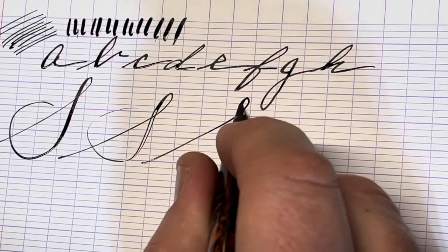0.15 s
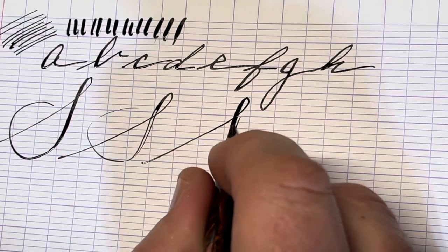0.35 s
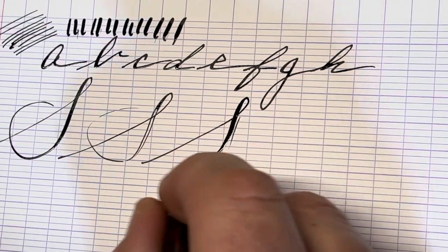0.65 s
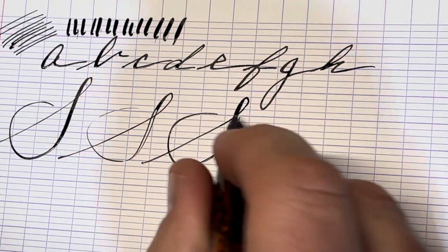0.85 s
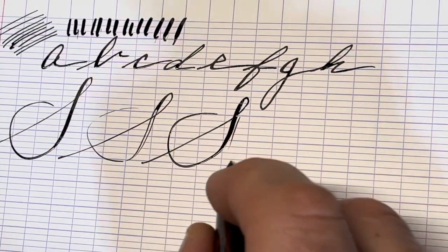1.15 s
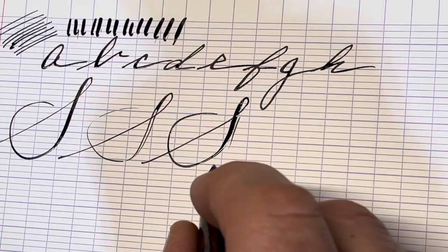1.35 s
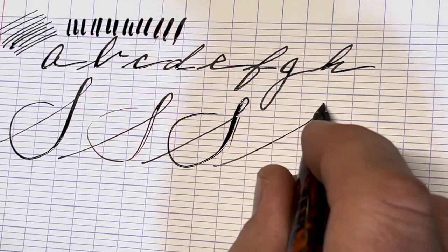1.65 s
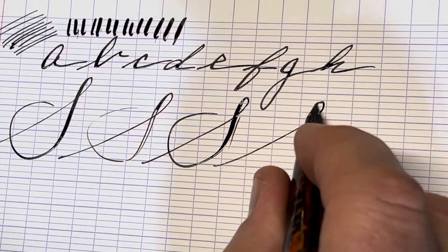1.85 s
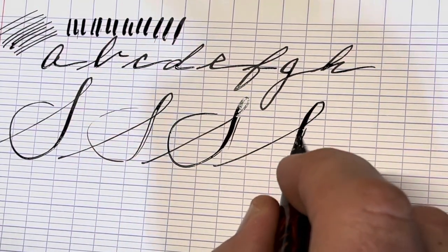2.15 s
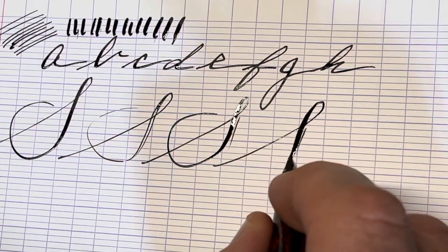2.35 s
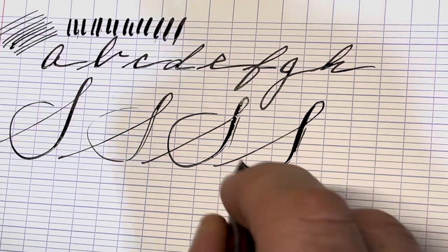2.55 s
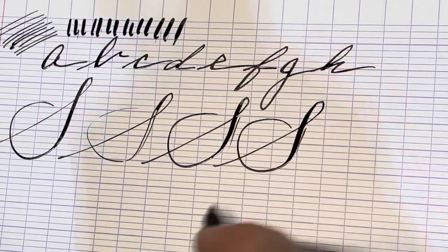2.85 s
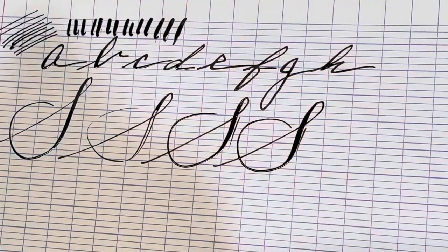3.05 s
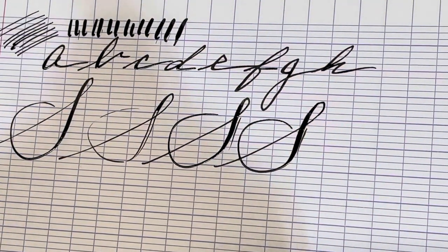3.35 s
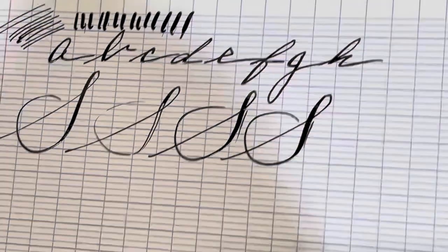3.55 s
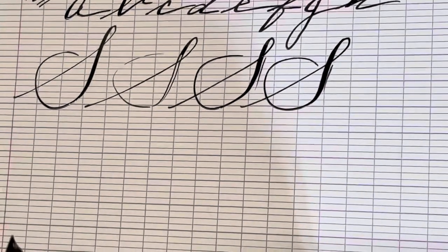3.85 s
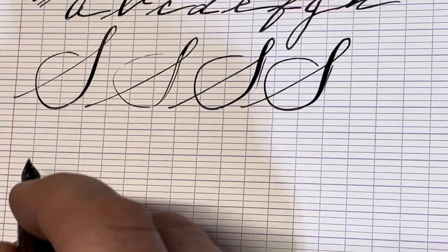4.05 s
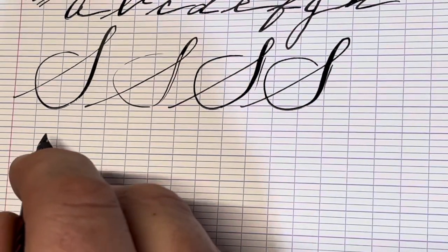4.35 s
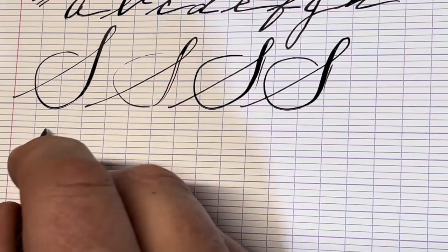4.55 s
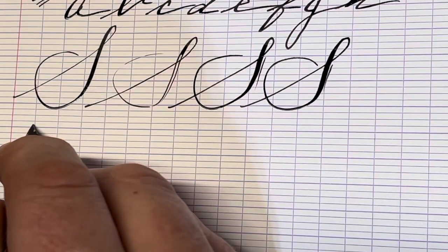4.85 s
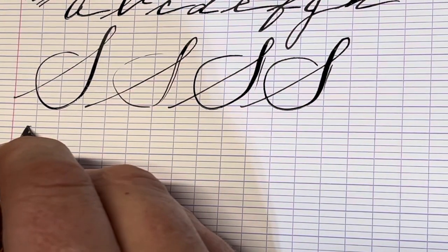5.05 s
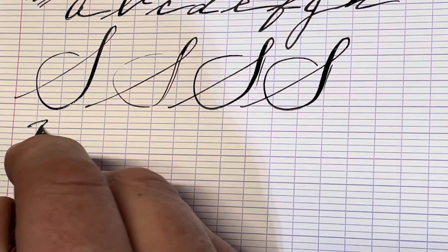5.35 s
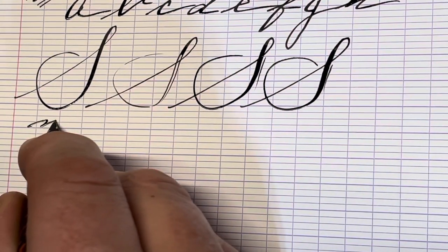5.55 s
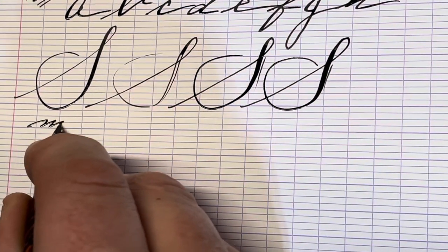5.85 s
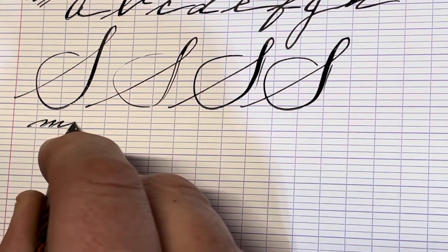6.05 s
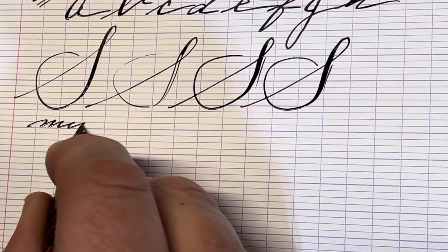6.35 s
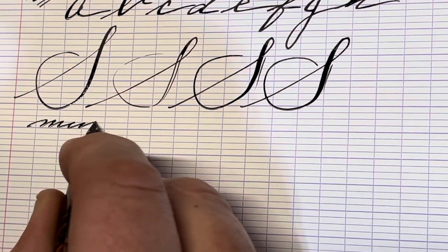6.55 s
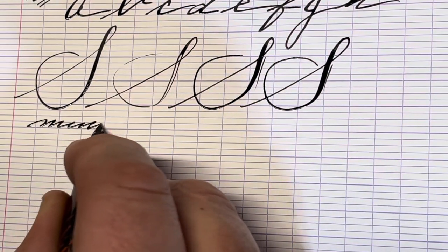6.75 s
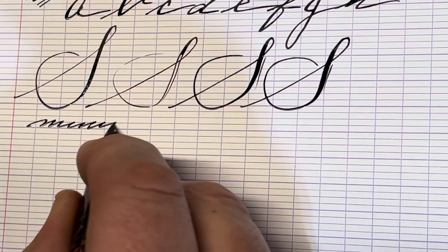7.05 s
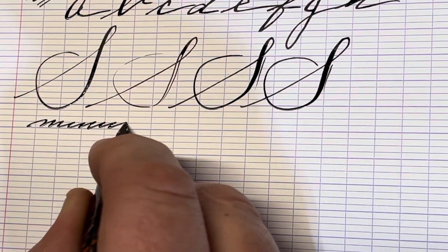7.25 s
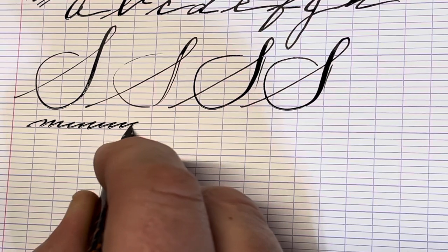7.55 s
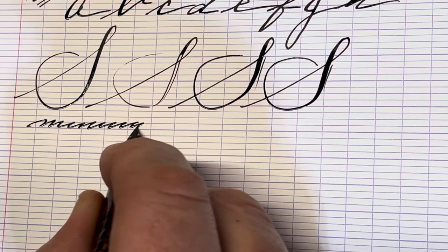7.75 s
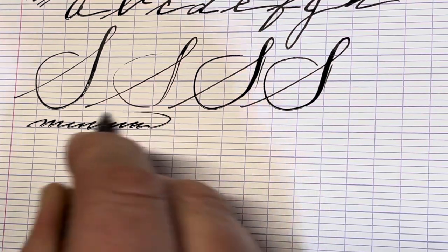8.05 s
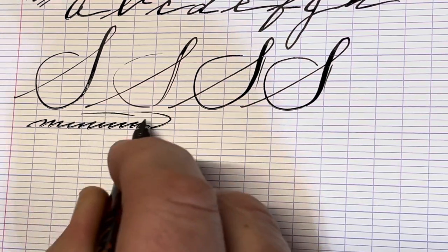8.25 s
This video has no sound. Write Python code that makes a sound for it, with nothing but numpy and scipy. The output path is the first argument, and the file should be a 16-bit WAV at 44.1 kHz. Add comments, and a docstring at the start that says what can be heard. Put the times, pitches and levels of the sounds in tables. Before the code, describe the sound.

Close, dry stereo pickup at a desk in a quiet small room with faint low rumble. From 0 to 0.5 seconds a slow nib judders hollowly with small sticky buzzes, then sweeps into a brighter scratch at 0.5-0.8 with a short falling squeak near 0.65. Two small clicks come around 1.0, then a near pause. A quick bright stroke at 1.4-1.6 leads into slow, grainy, hollow dragging until 2.4, then a fast scratch with a tiny steady squeak at 2.5. The hand brushes away in a soft hiss. From 3.1 to 4.3 short paper rubs mix with light knocks, sharpest at 3.5 and 4.1. After a lull and a barely audible fingertip rub, small letters begin at 5.1: faint alternating scratches, several a second, with a dull thump at 6.2. Longer strokes start at 7.85, ending in a crisp flick at 8.15 and a fading skin rub.

```python
"""Flexible fountain pen on ruled paper

A pen writes close to the microphone in a quiet room: it finishes one looped capital and draws another,
the hand slides over the sheet and things are nudged with a few knocks, then come small joined letters
and a closing flick. Clicks and noise of snapping fibres, shaped by spectra and resonances, make the
scratch, the hollow pen body and the slow judder; paired sines with a rasp make the squeaks in fast curves.
Hiss shaped as skin makes the slides, struck modes make the knocks, and shaped noise makes the room.
"""
import sys
import numpy as np
from scipy import signal
from scipy.fft import rfft, irfft
from scipy.io import wavfile
from scipy.ndimage import uniform_filter1d

SR = 44100
rng = np.random.default_rng(int(sys.argv[2]) if len(sys.argv) > 2 else 0)


def put_to_file(sound):
    """Save the sound as 16-bit audio at rate SR, in the file named by the first command-line argument."""
    columns = np.atleast_2d(sound).T  # one column per channel
    safe = np.clip(columns, -1, 1)
    whole_steps = np.round(safe * 32767)
    wavfile.write(sys.argv[1], SR, whole_steps.astype(np.int16))


N = 370440
TIME = np.arange(N) / SR

# Levels and spectra in the tables are relative: a function may trim them as a whole.
# squeaks of the tines in fast curves, one list a squeak: time_s, pitch_hz, level_db
SQUEAKS = [
    [(.59, 4960, -55), (.615, 4600, -50.5), (.648, 3970, -52), (.657, 3390, -39), (.668, 3330, -34.5),
     (.676, 3340, -64)],
    [(2.472, 3350, -47), (2.492, 3210, -34.5), (2.51, 3240, -38), (2.519, 3250, -41), (2.528, 3380, -62)],
]
# spectrum of the slow scratch: frequency_hz, density_db (per Hz)
SLOW_SCRATCH = [(300, -9), (900, 4), (1500, 5), (1850, -6), (2550, -0.5), (3400, -0.5), (4300, 0),
                (5200, 5), (6000, -4), (7000, 0), (8200, 4), (10000, 2.5), (11200, 9), (13000, -30.5),
                (15500, -44)]
# bending resonance of the pen, shifting with grip and direction: time_s, resonance_hz
PEN_BENDING = [(0, 1050), (.66, 1100), (.8, 1030), (1.44, 1500), (1.485, 1400), (1.55, 1055), (1.9, 1030),
               (2.38, 1056), (2.48, 1320), (2.55, 1070), (5.3, 960), (5.88, 960), (6.15, 1180),
               (7.55, 1200), (7.75, 1080), (8.16, 990)]


def amp(db):
    """Level law: decibels to amplitude gain."""
    return 10 ** (np.asarray(db) / 20)


def unit(x):
    """Normalization: scales to rms 1."""
    return x / np.sqrt(np.mean(x ** 2) + 1e-20)


def read(points, hz):
    """Spectral interpolation: reads a table along a log-frequency axis."""
    f, value = np.transpose(points)
    return np.interp(np.log(hz + 1), np.log(f), value)


def follow(rows):
    """Linear interpolation in time: joins the rows of a table, giving one curve a column."""
    s, *columns = np.transpose(rows)
    return [np.interp(TIME, s, c) for c in columns]


def add(mix, s, sound):
    """Superposition: mixes a sound in at time s."""
    part = mix[max(0, round(s * SR)):][:len(sound)]
    part += sound[:len(part)]


def wander(rate_hz):
    """Low-passed chance: a smooth random curve of rms 1, moving up to about the given rate."""
    hz = np.fft.rfftfreq(N, 1 / SR)
    lowpass = 1 / (1 + (hz / rate_hz) ** 4)
    return unit(irfft(rfft(rng.standard_normal(N)) * lowpass, N))


def resonate(x, hz, width_hz):
    """Damped resonance of peak gain 1: shifted to zero frequency, smoothed and shifted back; hz may be a curve."""
    turn = np.exp(2j * np.pi * np.cumsum(hz * np.ones(len(x))) / SR)
    r = np.exp(-np.pi * width_hz / SR)
    smoothed = signal.lfilter([1 - r], [1, -r], x / turn + 1e-18)
    return 2 * (turn * smoothed).real


def resonate_twice(x, hz, width_hz):
    """Cascaded resonance: the second pass steepens the skirts of the peak."""
    return resonate(resonate(x, hz, width_hz), hz, width_hz)


def ring(drive, modes):
    """Modal superposition: plays a drive through a table of modes; rms 1."""
    return unit(sum(amp(db) * unit(resonate(drive, hz, width_hz)) for hz, width_hz, db in modes))


def causal(gain_db):
    """Minimum phase: the impulse response that has this spectrum and starts at once."""
    log_gain = np.log(amp(np.concatenate([gain_db, gain_db[-2:0:-1]])))
    return irfft(np.exp(np.conj(signal.hilbert(log_gain)))[:len(gain_db)])


def swell(rise, hold, fall):
    """Kinematics of one movement: speed, 0-1, gathers, holds and dies away."""
    t = np.arange(0, rise + hold + fall, 1 / SR)
    ramp = np.minimum(t / rise, (rise + hold + fall - t) / fall)
    return np.sin(np.pi / 2 * np.clip(ramp, 0, 1))


def levels(moves, law):
    """Power law of friction: sound of each movement grows as speed ** law, overlaps add in power; in dB."""
    power = np.zeros(N)
    for start, rise, hold, fall, db in moves:
        add(power, start, (amp(db) * swell(rise, hold, fall) ** law) ** 2)
    return 10 * np.log10(power + 1e-12)


def fibres(rate, spread_db, smooth):
    """Impulsive friction: fibres snap past the tip as uneven clicks, rate a second, over a smooth rub."""
    sizes = amp(spread_db * np.minimum(rng.exponential(1, N), 4))
    snaps = (rng.random(N) < rate / SR) * rng.choice([-1, 1], N) * sizes
    return unit(unit(snaps) + smooth * rng.standard_normal(N))


def colour(x, spectrum, patchy_db, bright_db=0):
    """Time-varying filtering: peaks drift as the contact moves; rms 1 in the hiss band, 4-9.5 kHz."""
    hz, t, z = signal.stft(x, SR, nperseg=512, noverlap=384)
    patches = uniform_filter1d(rng.standard_normal(z.shape), size=6, axis=0)
    patches = unit(uniform_filter1d(patches, size=14, axis=1))
    bright = np.interp(t, TIME, bright_db * np.ones(N))
    # brightness tilts in dB per octave about 7 kHz, up to 0.7 octave either way
    slope = np.clip(np.log2((hz + 1) / 7000), -.7, .7)
    gain_db = read(spectrum, hz)[:, None] + patchy_db * patches + slope[:, None] * bright
    y = signal.istft(z * amp(gain_db), SR, nperseg=512, noverlap=384)[1][:N]
    hiss_band = signal.butter(4, [4000, 9500], "band", fs=SR, output="sos")
    return y / np.std(signal.sosfilt(hiss_band, y))


def room_tone():
    """Partial coherence: a low steady rumble with very little hiss, less alike in the two ports in the low
    mids, most apart near 600 Hz and fully alike again from 4 kHz."""
    # spectrum: frequency_hz, density_db (per Hz)
    spectrum = [(15, -43), (30, -12.5), (48, 1), (68, -2.5), (95, -4), (145, -8.5), (185, -16.5),
                (290, -18.5), (420, -32.5), (750, -34.5), (1300, -47), (4000, -56.5), (11000, -52.5),
                (15000, -83)]
    # left-right likeness: frequency_hz, coherence (0-1)
    likeness = [(30, 1), (130, 0.98), (260, 0.75), (600, 0.49), (4000, 1)]
    level_db = -51
    hz = np.fft.rfftfreq(N, 1 / SR)
    a, b = rfft(rng.standard_normal((2, N)))
    same = np.clip(read(likeness, hz), -1, 1)
    pair = np.array([a, same * a + np.sqrt(1 - same ** 2) * b])
    return amp(level_db) * unit(irfft(pair * amp(read(spectrum, hz)), N))


def reflections(x, t60, wet_db, dull_hz):
    """Early reflection and decay: near surfaces and a small dead room answer dully, differently in each port."""
    # first reflections from things near the desk, before dulling: delay_s, left_db, right_db
    echoes = [(.0023, -59, -34.5), (.0041, -16.5, -27), (.0068, -16.5, -18.5)]
    t = np.arange(SR // 2) / SR
    sparse = rng.standard_normal((2, len(t))) * (rng.random((2, len(t))) < 2000 / SR)
    tail = sparse * amp(-60 * t / t60) * (t > .003)
    tail *= amp(wet_db) / np.linalg.norm(tail[0])
    for delay, left_db, right_db in echoes:
        tail[:, round(delay * SR)] += amp([left_db, right_db])
    tail = signal.sosfilt(signal.butter(1, dull_hz, fs=SR, output="sos"), tail)
    return signal.fftconvolve(x[None], tail, axes=1)[:, :N]


def knocks():
    """Impact excitation: a blow and brief rattle pass the pad, ring one mode of the thing struck, thud in the desk."""
    # pen, pad and desk knocks: start_s, level_db, low_edge_hz, hardness_hz, ring_hz, ring_db,
    # blow_decay_s, desk_thud_db
    blows = [(.98, -43.5, 700, 9200, 3620, 4, 0.0025, -22), (1.024, -48, 2100, 12000, 3460, 1, 0.0014, -23),
             (3.092, -55.5, 400, 3000, 720, -4, 0.0011, -17),
             (3.148, -54, 500, 2000, 1010, -11, 0.0027, -14),
             (3.208, -58, 900, 7000, 2600, -8, 0.0028, -24),
             (3.288, -57, 2000, 12000, 9000, -10, .003, -31),
             (3.534, -27, 990, 7700, 4500, -10, 0.0019, -29),
             (3.579, -46.5, 700, 1500, 1060, 2.5, 0.003, -33),
             (3.655, -55, 500, 9000, 5240, -23, 0.0023, -14), (3.751, -39, 494, 3600, 2520, 4, 0.0013, -9),
             (3.872, -44, 399, 2540, 824, -8.5, 0.0027, -7.5),
             (3.972, -48, 500, 1420, 890, 0.5, 0.0066, -28),
             (4.095, -26, 431, 2660, 2460, -0.5, 0.0022, -30),
             (4.105, -34, 398, 2000, 834, -12, 0.0056, -10.5),
             (4.229, -48, 400, 2000, 760, -7, 0.0061, -11),
             (5.054, -65, 616, 6020, 2530, -18, 0.00083, -27),
             (6.212, -34, 150, 780, 635, -31, 0.025, -2.5),
             (6.574, -71.5, 3000, 12000, 11370, 17.5, 0.0014, -25),
             (7.284, -63.5, 3000, 12000, 11200, 7, 0.0035, -25)]
    # desk modes: frequency_hz, width_hz, level_db
    desk_modes = [(86.6, 14, -19.5), (120.2, 13, 8), (193, 27, 14), (261, 6.8, 0.5), (310, 40, -16.5),
                  (466, 15.4, 3.5)]
    # spectrum of the pad: frequency_hz, density_db (per Hz)
    pad_spectrum = [(100, -3.5), (400, -3), (600, 2.5), (1000, -0.5), (1450, -2), (1800, -2.5), (2700, 1),
                    (3500, -7.5), (4400, -2), (7000, -4.5), (9000, -1.5), (11500, -5), (13300, -23.5),
                    (15500, -27.5)]
    out, t, hz = np.zeros(N), np.arange(8192) / SR, np.fft.rfftfreq(2048, 1 / SR)
    for s, db, low_hz, hard_hz, ring_hz, ring_db, decay, thud_db in blows:
        fading = np.exp(-t / decay) + amp(-16.5) * np.exp(-t / .016)
        rattle = unit(rng.standard_normal(len(t)) * fading)
        tap = unit(signal.unit_impulse(len(t)))
        # soft blows lose the treble, light things radiate no bass
        treble_loss = 1 + (hz / hard_hz) ** 3
        bass_loss = 1 + (low_hz / (hz + 20)) ** 4
        pad = causal(read(pad_spectrum, hz) - 10 * np.log10(treble_loss * bass_loss))
        blow = unit(signal.fftconvolve(0.36 * tap + rattle, pad)[:len(t)])
        note = unit(resonate(tap + .5 * rattle, ring_hz, 150))
        thud = ring(tap, desk_modes)
        add(out, s, amp(db - 19.5) * (blow + amp(ring_db) * note + amp(thud_db) * thud))
    return out


def finger():
    """Light sliding friction: a fingertip creeps over the sheet as the pen is placed, a thin half-whistling rub."""
    # spectrum: frequency_hz, density_db (per Hz)
    whisper = [(3000, -23.5), (7000, -18.5), (7600, -15.5), (8000, 1), (8500, -11), (9100, -17), (9550, 2),
               (10000, -4), (10600, 6.5), (11200, -14), (12300, -27.5), (14000, -41.5)]
    # course of the rub: time_s, level_db
    course = [(4.8, -100), (4.87, -72), (5.05, -69.5), (5.22, -77), (5.32, -112), (5.4, -100)]
    return colour(fibres(9000, 2, 1), whisper, patchy_db=2) * amp(follow(course)[0])


def hand():
    """Sliding friction: the side of the hand makes a fine hiss that swells and has its own brightness each slide."""
    # slides: start_s, rise_s, hold_s, fall_s, level_db, brightness_db (per octave)
    slides = [(0.83, 0.089, .02, 0.2, -58, 6), (2.614, 0.29, .07, .13, -55, 7),
              (3.072, 0.064, 0.034, .03, -57, 1.5), (3.168, 0.04, 0.011, 0.025, -49.5, 7.5),
              (3.228, 0.018, 0.033, .02, -64, 4.5), (3.283, 0.0091, 0.052, 0.19, -49, 7.5),
              (3.447, 0.052, 0.0091, 0.033, -51, 1.5), (3.54, 0.032, 0.061, 0.12, -63.5, -3),
              (3.727, 0.028, 0.086, .04, -64, -4), (3.858, 0.018, 0.048, 0.11, -58.5, 5.5),
              (3.978, 0.042, .08, .01, -68, 0.5), (4.08, 0.0074, 0.0085, 0.084, -43.5, 2.5),
              (4.142, 0.048, 0.035, 0.076, -54, 0), (4.246, 0.12, 0.069, 0.1, -59, 1.5),
              (4.47, 0.048, 0.017, 0.17, -78, -4), (7.979, 0.043, .01, 0.11, -55.5, 7),
              (8.164, 0.031, 0.023, 0.11, -66, -1.5), (8.273, .06, 0.017, 0.077, -67.5, 4.5)]
    # spectrum of skin on paper: frequency_hz, density_db (per Hz)
    skin = [(200, 4), (600, 3.5), (1150, 0.5), (1750, -2), (2600, 4.5), (3600, 1.5), (6000, 1.5), (7200, 2),
            (9000, 3.5), (11200, 8), (12500, -14.5), (14000, -29), (15500, -22)]
    db = levels([row[:-1] for row in slides], law=1.75)
    mid_slide = [(start + rise + hold / 2, bright) for start, rise, hold, _, _, bright in slides]
    hiss = colour(fibres(9000, 4.3, 0.71), skin, patchy_db=2.26, bright_db=follow(mid_slide)[0])
    return hiss * amp(db - 3.0 + 0.8 * wander(60))


def nib(rub, share):
    """Structural resonance: blends a rub, by share of power, with friction that rings in the steel of the nib."""
    # nib modes: frequency_hz, width_hz, level_db
    nib_modes = [(4720, 220, 3.5), (5780, 710, 6), (6600, 210, 7.5), (7800, 470, 2.5), (11500, 910, -12)]
    share, drive = np.clip(share, 0, 1), fibres(5000, 1.5, 0.27)
    steel = unit(sum(amp(db) * unit(resonate_twice(drive, hz, width_hz)) for hz, width_hz, db in nib_modes))
    return np.sqrt(1 - share) * rub + np.sqrt(share) * steel


def pen_body(drive, hz, width_hz, upper_hz, upper_db):
    """Bending vibration: the dragged nib shakes the pen in a low mode and a weaker one above it."""
    low = resonate_twice(drive, hz, width_hz)
    high = resonate_twice(drive, upper_hz, 918)
    return unit(low) + amp(upper_db) * unit(high)


def slips():
    """Stick and release: each letting go of the slow nib is a short buzz of the pen body with a little grating."""
    # releases: start_s, length_s, level_db
    releases = [(.006, 0.011, -45.5), (0.032, 0.022, -52.5), (0.053, 0.024, -55), (0.1, 0.013, -50),
                (0.116, 0.0053, -46), (0.131, 0.0073, -48.5), (0.145, 0.009, -58), (0.193, 0.016, -65),
                (0.224, .016, -57), (1.63, 0.035, -45), (1.857, 0.02, -46.5), (1.957, 0.023, -49),
                (1.984, 0.011, -47.5), (5.563, .012, -62), (7.056, 0.014, -57), (7.506, .012, -60)]
    push = np.zeros(N)
    for s, length, db in releases:
        add(push, s, amp(db) * signal.windows.tukey(int(length * SR), .6))
    buzz = pen_body(fibres(2500, 0.8, 0.46), 1018, width_hz=166, upper_hz=2410, upper_db=-19)
    grate = colour(fibres(3500, 5.6, 0.35), SLOW_SCRATCH, patchy_db=6.0)
    return push * (amp(-4.5) * buzz + amp(-31.0) * grate)


def squeaks():
    """Stick-slip oscillation: high pitch is a rough squeal, low pitch a tone whose octave meets a nib resonance."""
    out = np.zeros(N)
    rasp = unit(resonate_twice(fibres(4000, 3, 0.36), 4600, 700))  # the chattering tines
    for rows in SQUEAKS:
        hz, db = follow(rows)
        loose = np.clip((hz - 3400) / 700, 0, 1)  # 0 locked, 1 rough
        jitter = .016 + .06 * loose
        phase = 2 * np.pi * np.cumsum(hz * (1 + jitter * wander(488))) / SR
        octave = amp(7.0 - 8.9 * loose)
        tone = (np.sin(phase) + octave * np.sin(2 * phase)) / np.sqrt((1 + octave ** 2) / 2)
        squeal = tone + amp(10 * loose - 11.0) * rasp
        sounding = (TIME > rows[0][0]) * (TIME < rows[-1][0])
        out += squeal * amp(db - 5 + 2 * wander(250)) * sounding
    return out


def letters():
    """Speed-dependent friction: scratch arches over each quick stroke, and the pen body swells a little later."""
    # small letters, up and down strokes in turn: start_s, length_s, scratch_db
    small_strokes = [(5.13, 0.14, -62), (5.262, 0.1, -64.5), (5.411, 0.12, -65), (5.555, 0.082, -64),
                     (5.68, 0.11, -66.5), (5.815, 0.096, -73.5), (5.944, .125, -62), (6.128, 0.079, -68),
                     (6.217, 0.11, -63), (6.35, 0.088, -68.5), (6.457, 0.11, -61), (6.566, 0.1, -62.5),
                     (6.684, 0.12, -65.5), (6.83, 0.077, -68.5), (6.931, .108, -62.5), (7.05, 0.073, -62),
                     (7.158, 0.12, -66), (7.279, 0.084, -64.5), (7.385, .11, -64.5), (7.498, 0.076, -61.5),
                     (7.585, 0.081, -72.5), (7.692, 0.067, -61.5), (7.76, 0.091, -68), (7.834, 0.074, -66)]
    # spectrum of the scratch: frequency_hz, density_db (per Hz)
    spectrum = [(300, -5.5), (600, -5), (1000, -6), (1800, -9.5), (2500, -16), (3500, -12), (4100, -9),
                (4700, -5.5), (5300, -6.5), (5900, -2.5), (6600, -3), (7300, -8.5), (8200, -6.5),
                (9800, -8), (11400, -9.5), (13500, -52)]
    scratch_law, body_arch, body_lag = 1.14, 0.51, 1.47  # exponents: steep arch, flatter arch, delay
    turn_sag = 0.18  # the resonance sinks by this share where a letter turns
    scratch, body, bend = np.zeros(N), np.zeros(N), []
    for k, (start, length, scratch_db) in enumerate(small_strokes):
        # a pushed upstroke hardly shakes the pen, a pulled downstroke does; share is of the resonance frequency
        downstroke = k % 2
        body_db, share = (-62, 1) if downstroke else (-79, 0.71)
        u = np.linspace(0, 1, max(int(length * SR), 2))
        add(scratch, start, amp(scratch_db) * np.abs(np.sin(np.pi * u)) ** scratch_law)
        add(body, start, amp(body_db) * np.abs(np.sin(np.pi * u ** body_lag)) ** body_arch)
        turn = share * (1 - turn_sag)
        bend += [(start, turn), (start + length / 2, share), (start + length, turn)]
    hiss = nib(colour(fibres(5000, 3, .5), spectrum, patchy_db=3), share=.3)
    bending_hz = follow(PEN_BENDING)[0] * follow(sorted(bend))[0]
    drone = pen_body(fibres(2000, 2.5, .3), bending_hz, width_hz=520, upper_hz=1700, upper_db=-13)
    return amp(1.3 * wander(70)) * (scratch * hiss + body * drone)


def capitals():
    """Friction-driven vibration: flexed strokes judder hollowly when slow, hiss when fast, and flutter the sheet."""
    # long strokes and closing flick: start_s, rise_s, hold_s, fall_s, scratch_db, pen_body_db
    strokes = [(0, 0.0068, 0.012, 0.038, -63.5, -59), (0.092, 0.011, 0.027, 0.032, -73, -58.5),
               (0.174, 0.021, .005, 0.016, -67, -50), (0.218, 0.0083, 0.02, 0.12, -59.5, -49.5),
               (0.302, .025, 0.31, .04, -63, -51.5), (0.533, 0.092, 0.046, .04, -46, -44),
               (0.664, 0.019, 0.033, 0.053, -47, -48), (0.722, 0.021, 0.038, 0.078, -52, -60.5),
               (1.412, 0.12, 0.0057, 0.05, -42.5, -43.5), (1.538, 0.029, 0.017, .11, -55.5, -50),
               (1.639, 0.024, 0.032, 0.018, -85, -53), (1.777, 0.025, 0.016, 0.052, -63.5, -52),
               (1.863, 0.026, 0.017, 0.083, -60, -47), (1.924, 0.027, 0.099, .04, -71, -56),
               (2.045, .03, .16, 0.11, -60, -51), (2.27, 0.049, 0.03, 0.045, -64.5, -49),
               (2.366, 0.031, 0.075, .03, -58.5, -46), (2.425, 0.057, .06, 0.08, -46.5, -45.5),
               (2.556, 0.03, 0.076, 0.048, -52, -53), (7.854, 0.086, 0.023, .055, -58.5, -61.5),
               (7.972, 0.048, 0.013, 0.054, -63, -82), (8.122, 0.048, 0.0048, .045, -40, -58.5)]
    # flutter of the sheet, most as the nib leaves a tight curve: start_s, rise_s, hold_s, fall_s, level_db
    flutters = [(.345, 0.018, .005, 0.022, -52.5), (.65, 0.016, .02, 0.066, -49),
                (2.515, 0.014, 0.015, 0.031, -45.5), (5.255, .04, .03, .04, -62),
                (5.56, .03, .03, .04, -66), (5.815, 0.043, .03, .05, -66)]
    # spectrum of the fast scratch: frequency_hz, density_db (per Hz)
    fast_scratch = [(300, -25), (900, -9), (1900, -7.5), (2600, -7.5), (3800, -5.5), (4700, 1), (5900, 3.5),
                    (6700, 3), (8600, 2.5), (10000, 11.5), (11300, 4), (13000, -9), (15500, -28)]
    scratch_db = levels([(*timing, db) for *timing, db, _ in strokes], law=2.5)
    body_db = levels([(*timing, db) for *timing, _, db in strokes], law=2.1)
    # the pen body calms by 15 dB while the tines squeak
    squealing = sum(1. * (TIME > rows[0][0]) * (TIME < rows[-1][0]) for rows in SQUEAKS)
    body_db = body_db - 15 * uniform_filter1d(squealing, size=1500)
    # a steady flutter, 13 dB below the pen body curve, underlies the listed ones
    flutter = np.hypot(amp(levels(flutters, law=0.77)), amp(body_db - 13))
    # a weak scratch tells a slow nib
    slow = np.clip((-49.5 - scratch_db) / 16, .2, 1)
    judder = amp(slow * (2.2 * wander(55) - 3.5))
    fast = np.clip((scratch_db + 63) / 9, 0, 1)
    grate = colour(fibres(3500, 2.6, 0.44), SLOW_SCRATCH, patchy_db=2.5)
    hiss = nib(colour(fibres(7000, 2.9, 1.0), fast_scratch, patchy_db=5.0), share=0.082)
    scratch = (np.sqrt(1 - fast) * grate + np.sqrt(fast) * hiss) * amp(scratch_db)
    bending_hz = follow(PEN_BENDING)[0]
    body = pen_body(fibres(2500, 2.1, 0.36), bending_hz, width_hz=400, upper_hz=2450, upper_db=-7.0)
    body = body * amp(body_db - 6)
    sheet = unit(resonate(resonate(fibres(1500, 2.2, 0.86), 560, 240), 650, 220)) * flutter * amp(-6.5)
    # the slow, pressed nib drums the desk
    murmur = unit(resonate_twice(fibres(1500, 3, 0.31), 260, 180)) * slow * amp(body_db - 8.5)
    return judder * (scratch + body + sheet + murmur)


def scene():
    """Superposition: all the sounds on the desk, their reflections and the room tone."""
    # swell of the rumble: time_s, level_db
    rumble = [(0, -0.5), (2.2, -1.5), (3.25, 3.5), (3.7, -0.5), (4.2, 2.5), (4.7, -0.5), (8.4, -0.5)]
    desk = capitals() + slips() + letters() + squeaks() + hand() + finger() + knocks()
    room = room_tone() * amp(follow(rumble)[0] + 1.0 * wander(5.4))
    return desk + reflections(desk, t60=0.2, wet_db=-10.5, dull_hz=2200) + room


def record(dry):
    """Interchannel level and phase: the two microphone ports differ with frequency; then the band limit."""
    # port balance: frequency_hz, left_minus_right_db
    balance = [(30, 1.5), (130, 1.2), (500, 4), (1000, 2), (2000, 0.1), (4000, -0.5), (16000, 1)]
    # port phase: frequency_hz, left_lead_rad
    port_phase = [(20, 0), (600, 0), (800, -.15), (1200, .2), (1800, -.15), (2600, .1), (3250, .55),
                  (4000, .2), (5500, .15), (8000, .2), (8700, .1), (9300, -1.7), (10300, -3.14),
                  (11800, -6.28), (12500, -6.28), (13300, -9.42), (14000, -9.42), (14800, -12.57)]
    edge_hz = 15750
    hz = np.fft.rfftfreq(N, 1 / SR)
    lean = amp(read(balance, hz) / 2)
    lead = np.exp(1j * read(port_phase, hz))
    ports = irfft(rfft(dry) * np.array([lean * lead, 1 / lean]), N)
    band_limit = signal.firwin(511, edge_hz, window=("kaiser", 9), fs=SR)
    return signal.oaconvolve(ports, band_limit[None], "same")


dry = scene()
out = record(dry)
put_to_file(out)
```